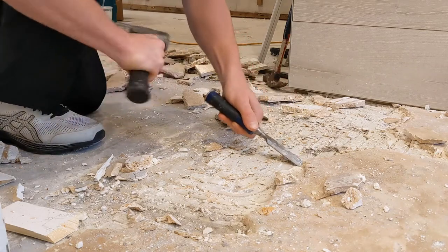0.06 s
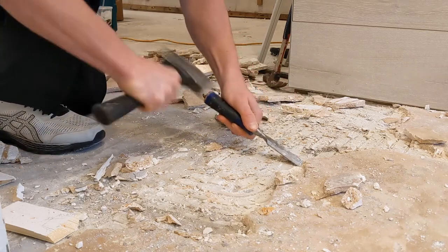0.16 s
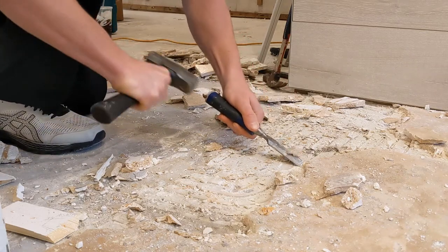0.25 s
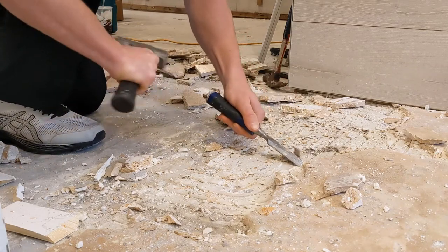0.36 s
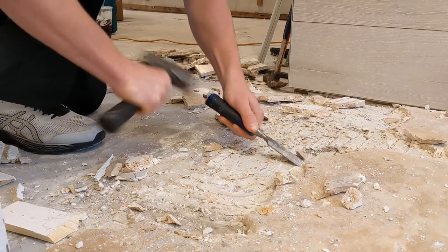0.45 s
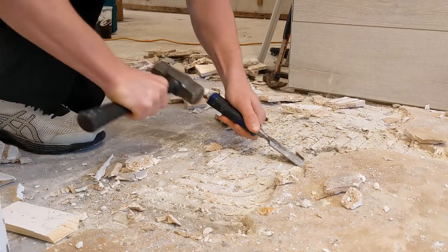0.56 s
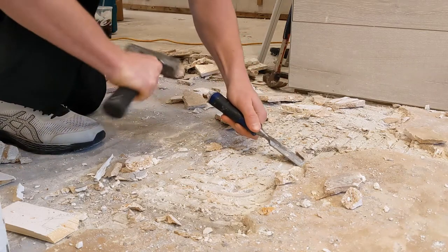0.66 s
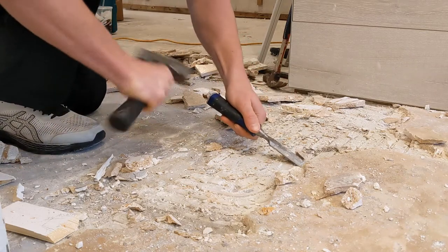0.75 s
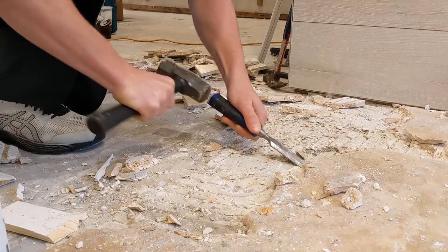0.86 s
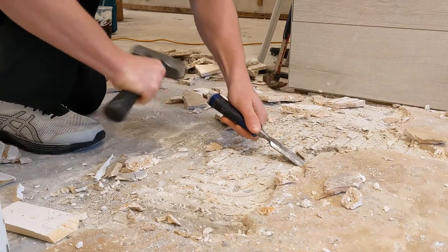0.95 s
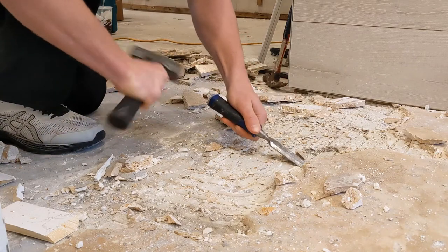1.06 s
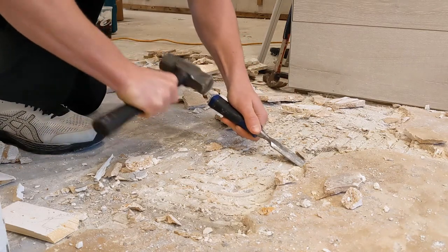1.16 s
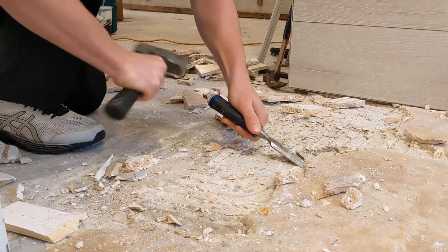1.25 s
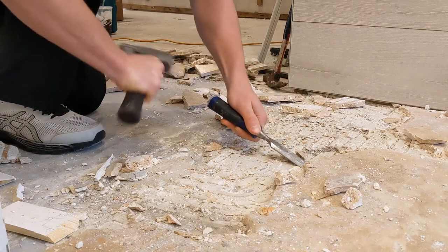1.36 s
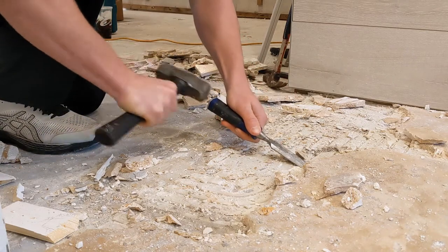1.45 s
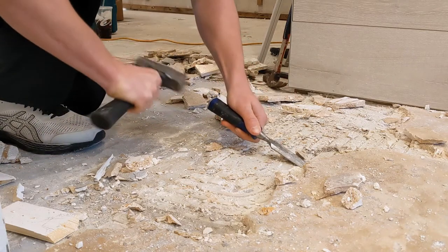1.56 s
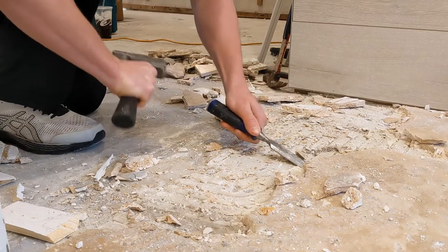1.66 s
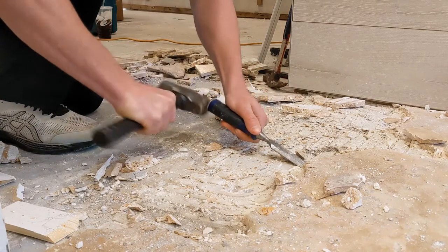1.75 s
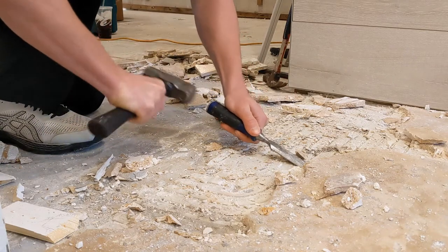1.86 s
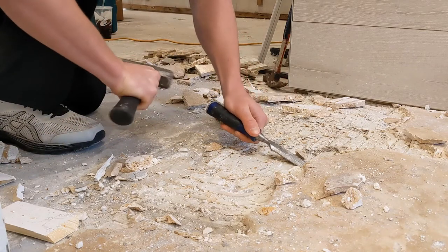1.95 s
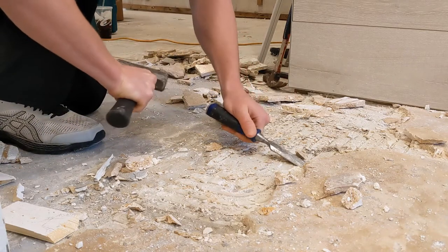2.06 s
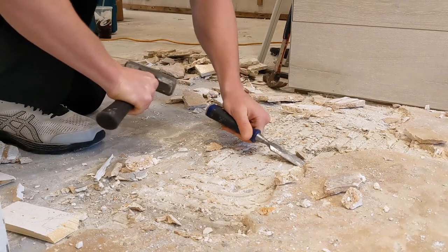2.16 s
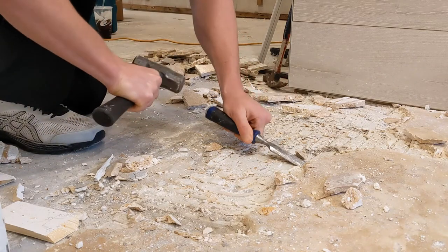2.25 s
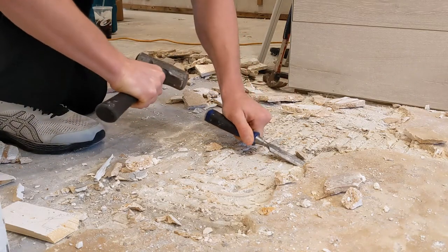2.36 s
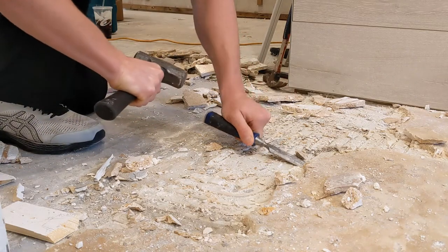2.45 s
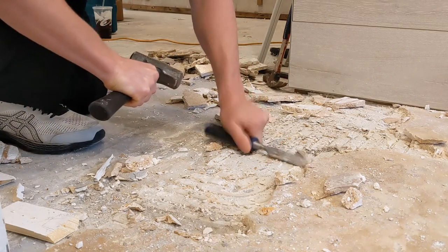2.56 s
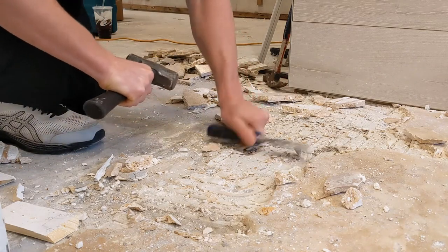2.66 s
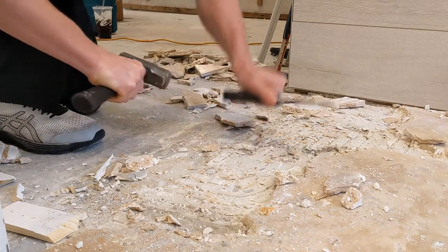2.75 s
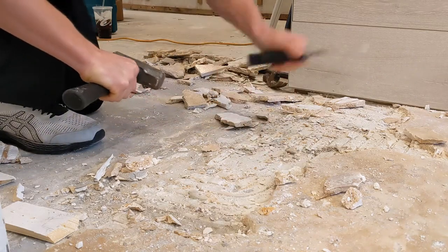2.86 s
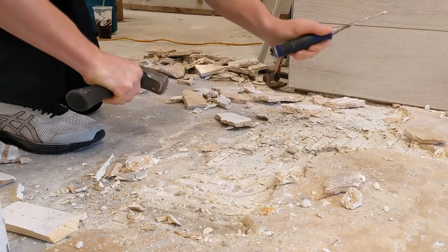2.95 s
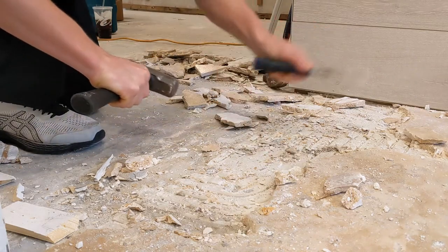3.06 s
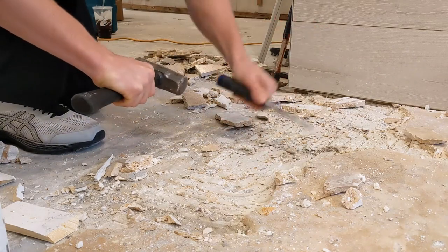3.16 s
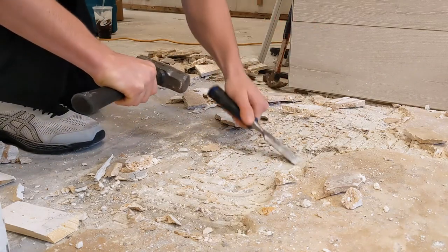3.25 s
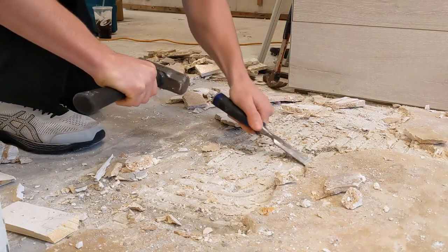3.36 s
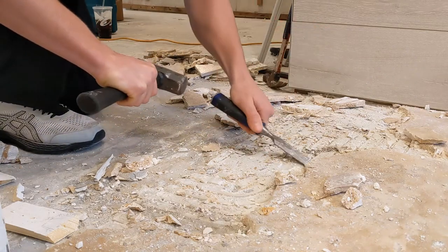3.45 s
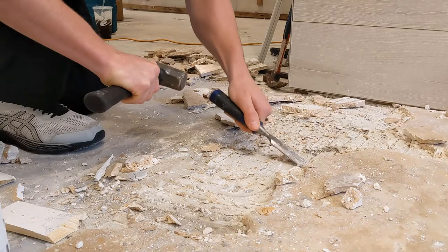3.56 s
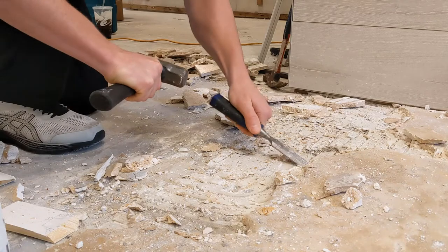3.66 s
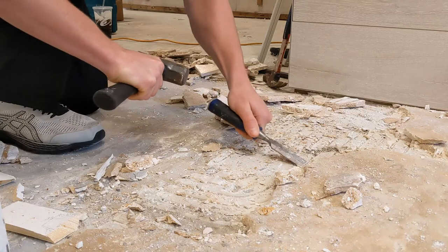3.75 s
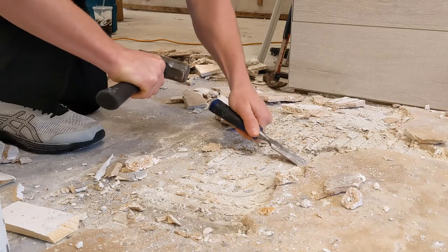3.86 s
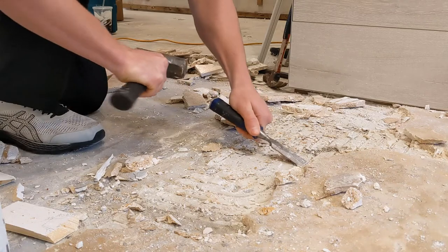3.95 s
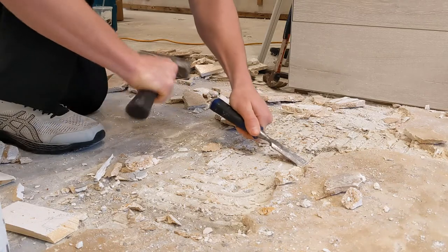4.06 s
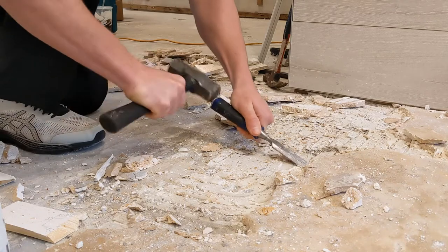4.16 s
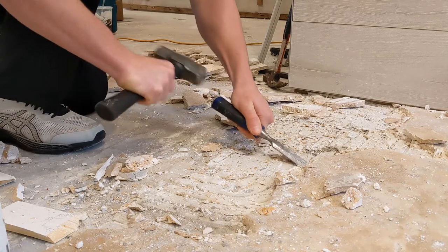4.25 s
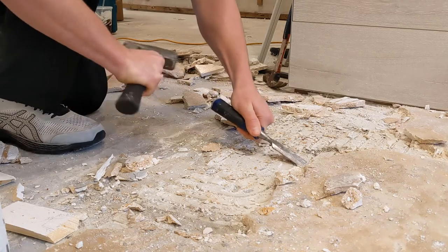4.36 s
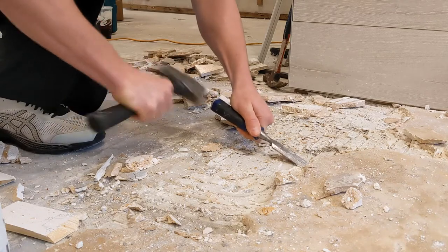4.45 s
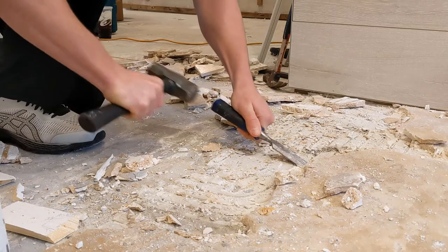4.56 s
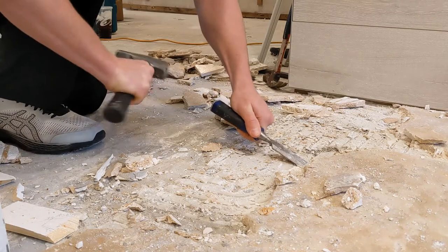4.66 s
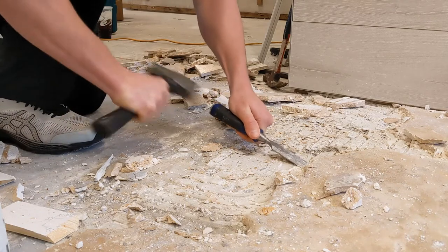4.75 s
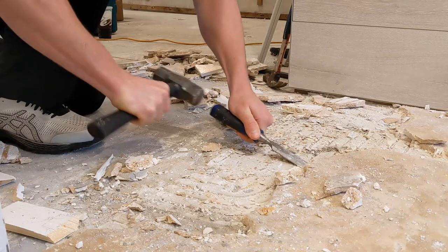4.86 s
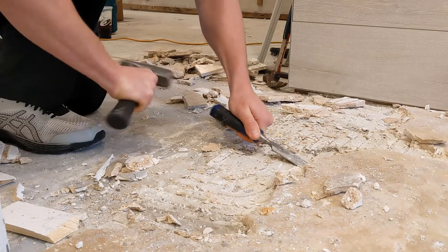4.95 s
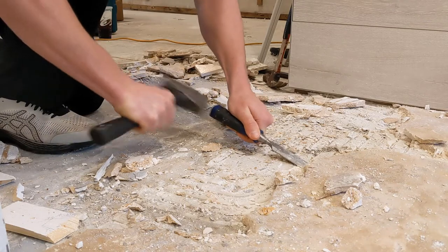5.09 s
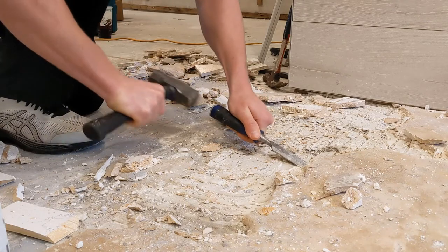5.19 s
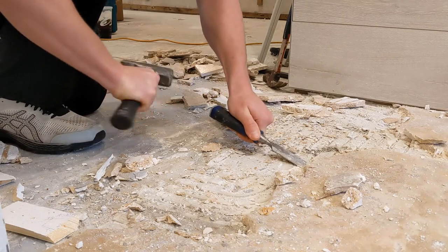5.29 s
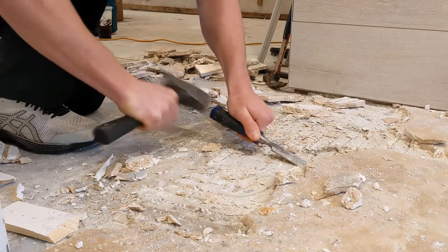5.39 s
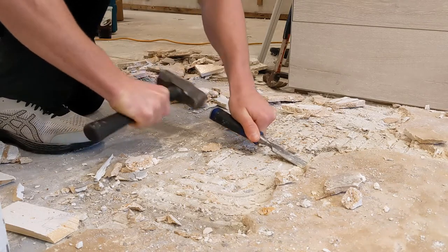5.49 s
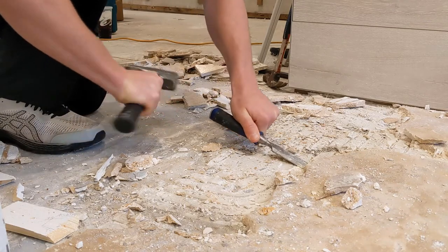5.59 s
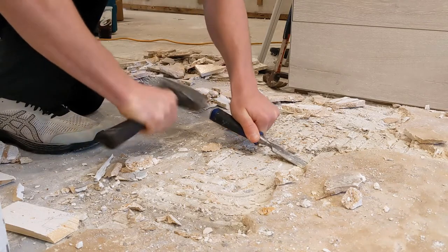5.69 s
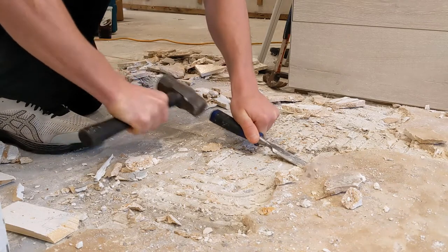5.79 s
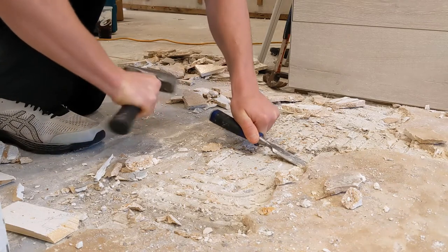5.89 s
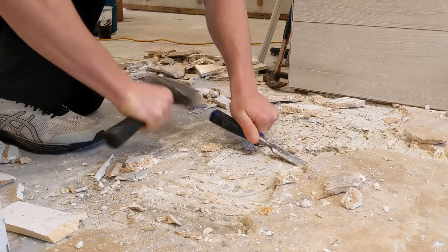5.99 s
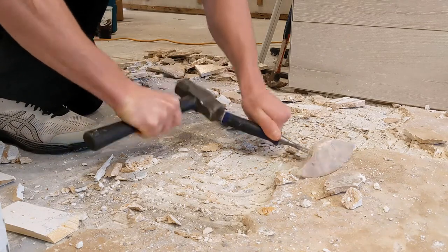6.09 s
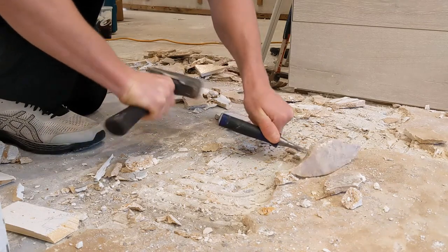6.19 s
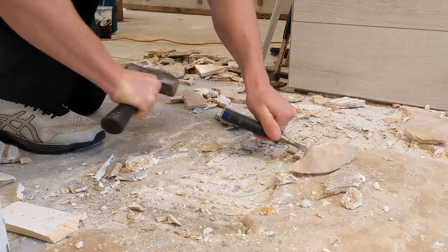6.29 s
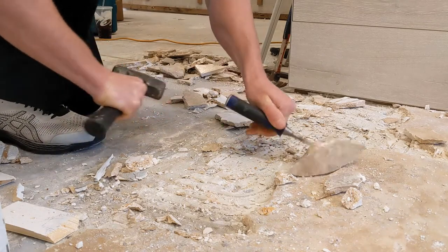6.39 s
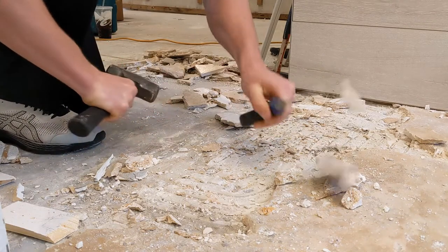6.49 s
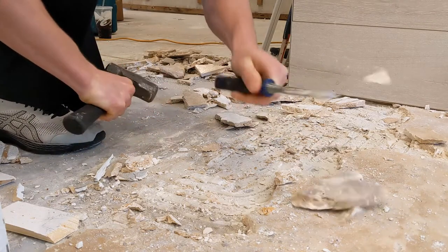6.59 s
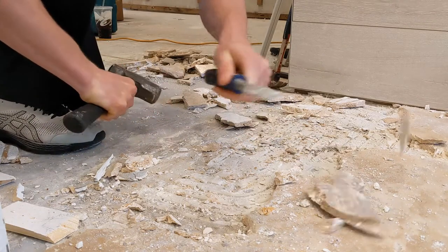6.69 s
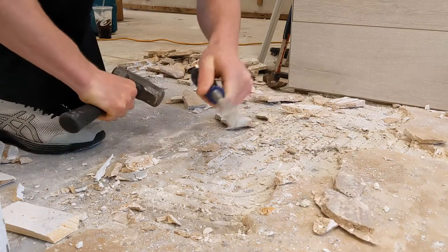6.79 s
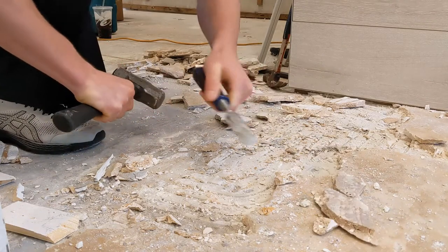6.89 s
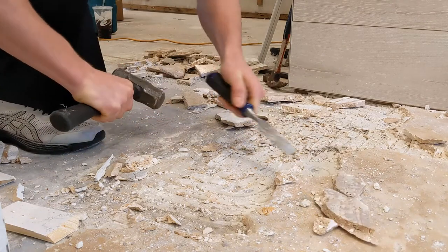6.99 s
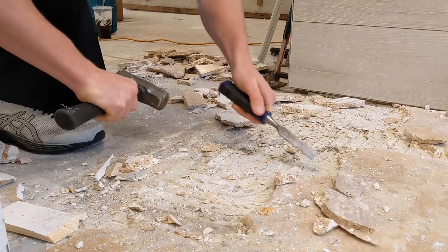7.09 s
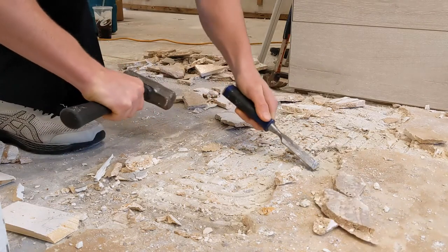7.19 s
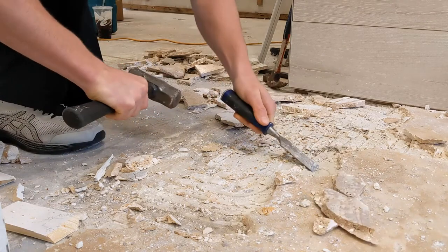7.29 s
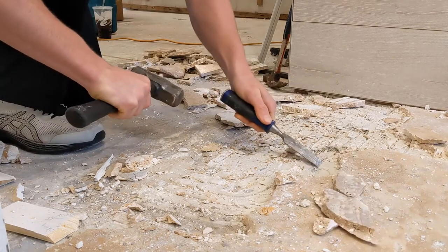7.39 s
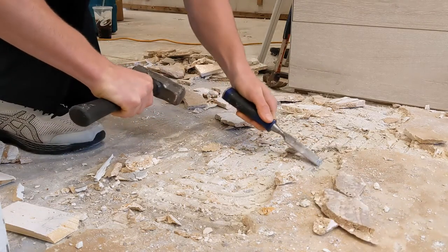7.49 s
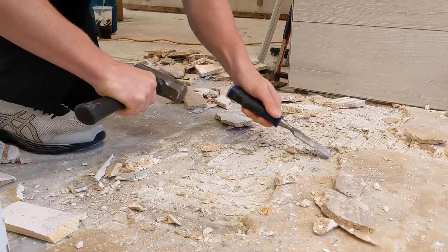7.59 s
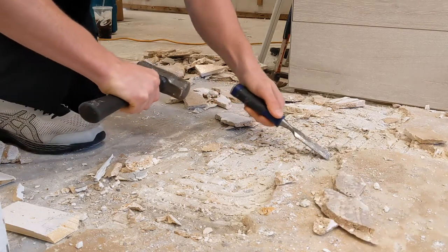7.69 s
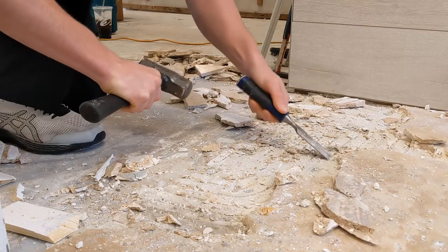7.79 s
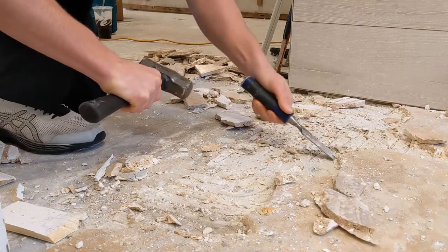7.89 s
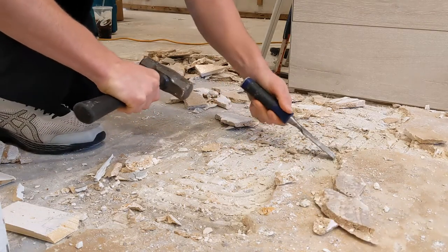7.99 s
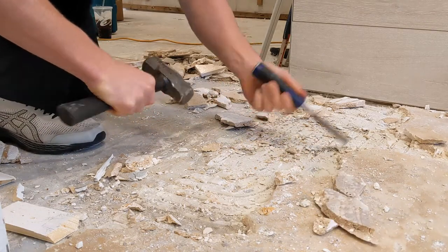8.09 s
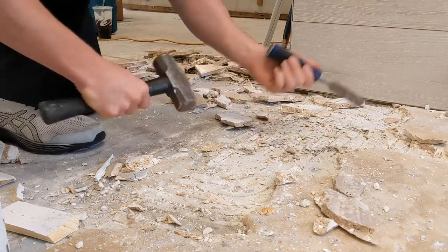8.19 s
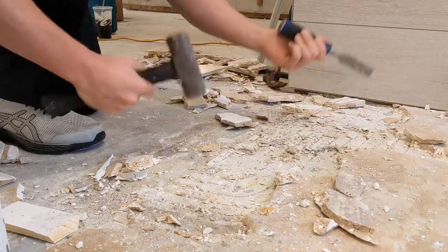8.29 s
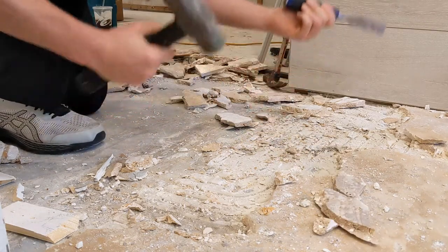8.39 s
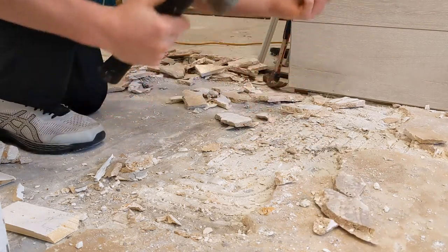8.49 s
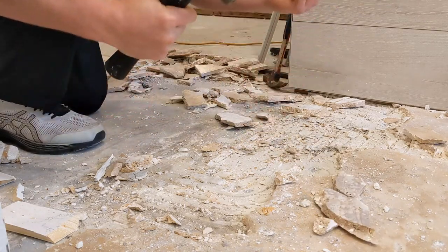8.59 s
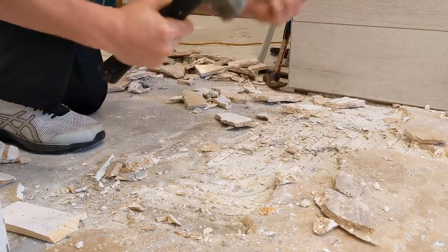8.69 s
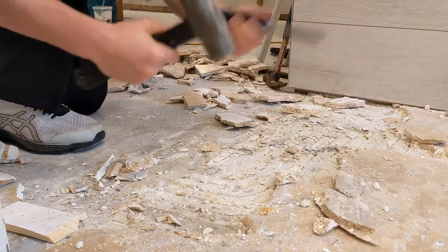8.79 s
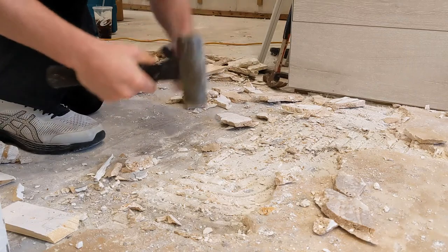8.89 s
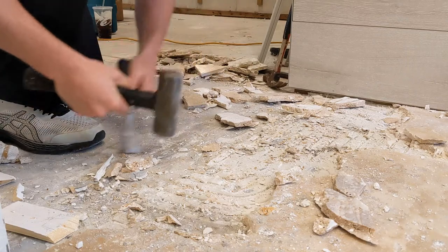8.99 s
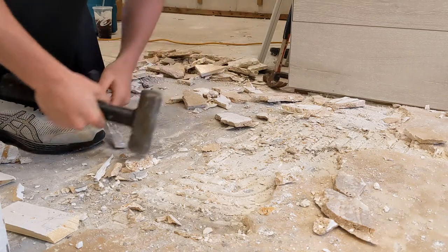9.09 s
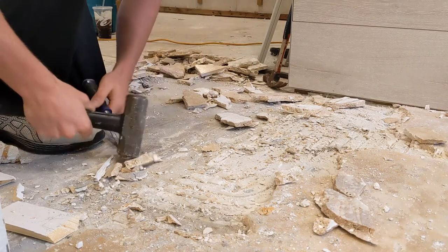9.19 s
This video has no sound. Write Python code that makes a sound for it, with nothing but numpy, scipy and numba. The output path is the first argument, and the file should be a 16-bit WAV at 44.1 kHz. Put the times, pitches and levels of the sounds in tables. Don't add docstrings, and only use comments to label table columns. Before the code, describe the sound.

Close up in a bare, reverberant room, a heavy hammer strikes a steel chisel about three times a second, each loud crack carrying a hollow tile knock and floor thump. Tip taps and gritty scraping fill a pause. A second run ends with falling tile shards, then light taps, quiet, and the hammer landing with tight bounces.

```python
import sys
import numpy as np
from scipy import signal
from scipy.fft import rfft, irfft
from scipy.io import wavfile
from scipy.ndimage import uniform_filter1d, minimum_filter1d
from numba import njit

SR = 44100
rng = np.random.default_rng(int(sys.argv[2]) if len(sys.argv) > 2 else 0)


def put_to_file(sound):
    columns = np.atleast_2d(sound).T
    safe = np.clip(columns, -1, 1)
    whole_steps = np.round(safe * 32767)
    wavfile.write(sys.argv[1], SR, whole_steps.astype(np.int16))


def gain_from_db(level_db):
    decades = np.asarray(level_db, float) / 20
    return 10 ** decades


N = 407484
PAD = SR // 2

# (time [s], heard peak [dB], chisel bend [Hz], bend level [dB], slab thump [dB])
BLOWS = [(-.095, -2.5, 1845, 5, -4.5), (.2220, 1.5, 1792, 2.5, -14), (0.5393, -0.5, 1790, 6.5, -20.5),
         (0.8506, -0.5, 1795, 2.4, -30.5), (1.1672, -3, 1726, 8.5, -21), (1.4860, -2.5, 1608, 9.5, -16),
         (1.809, 0, 1956, -2, -11), (4.1976, -8.5, 1782, 5, -11.5), (4.5299, -2.5, 1690, 7, -11),
         (4.8423, -0.8, 1712, 6.5, -17.5), (5.1572, -2, 1746, 8, -18.5), (5.4571, -1, 1745, 3.5, -20.5),
         (5.7611, -2, 1930, 1.5, -22), (6.0721, -1.5, 1790, 4.5, -37), (6.849, -20.5, 2030, -38, -47.5)]
# (time [s], drum [Hz], drum level [dB], dull knock [dB], edge bite [dB])
TILE_STATE = [(-.1, 1186, 1.5, -1.5, 2), (.54, 1154, 2.7, -6, -0.5), (1.17, 1310, 6.5, -2.5, 0),
              (1.49, 1362, -32.5, -7.5, 4), (1.811, 1455, 1.5, -1, -2), (4.2, 1160, -2, 3.7, -0.5),
              (4.531, 1304, 6, -2, -1.5), (5.16, 1255, -2.2, 1, 2), (6.07, 1258, 4.5, 8, 0)]
# (blow time [s], delay [ms], level re blow [dB])
REBOUNDS = [(-.095, 0.73, -15.5), (.222, .42, -17.5), (.5395, .893, -5), (.8503, .3, -18.5),
            (1.1666, 0.57, -18.5), (4.1977, .823, 5), (4.5295, .6, -16.5), (4.8413, .34, -19.5),
            (5.4568, 0.71, -19.5)]
# (frequency [Hz], width [Hz], level [dB])
STEEL_MODES = [(3305, 1360, -10.5), (4890, 983, 3), (6335, 1850, 6), (7850, 1230, 2)]
# (frequency [Hz], width [Hz], level [dB])
EDGE_MODES = [(9200, 944, -1), (10010, 890, -6), (12360, 2520, 8), (13700, 2800, -9)]
# (time [s], peak [dB])
HEAD_DROPS = [
    (9.1772, -5),
    (9.186, -9),
    (9.1908, -9.5),
]
# (frequency [Hz], width [Hz], level [dB])
HEAD_MODES = [(246, 220, -8.5), (560, 280, -8), (1290, 650, -13), (3300, 690, -11.5), (5300, 310, -0.5),
              (6510, 670, -3.5), (7530, 1100, 2.5), (8550, 410, -7), (10600, 1900, -18.5),
              (12630, 1200, -20.5)]
# (time [s], level [dB])
KNEE_THUDS = [(2.222, -23), (2.644, -34), (6.459, -30), (9.178, -21)]
# (time [s], peak [dB], clatter re ring [dB])
SHARD_FALLS = [(6.454, -18.5, -13.5), (6.472, -23, -3), (6.509, -24, -8), (6.577, 9, -0.5),
               (6.688, -11, -2.5)]
# (frequency [Hz], width [Hz], level [dB])
SHARD_MODES = [(2160, 430, -11.5), (3840, 520, -4.5), (4186, 62, -6), (5270, 880, -0.5), (6250, 800, 4.5),
               (6950, 81, -6), (7700, 740, -5.5), (8900, 75.5, -24.5), (8600, 1300, -15),
               (9640, 120, -27.5), (10900, 3800, -15), (13000, 1300, -12.5)]
# (time [s], peak [dB])
FLAKE_FALLS = [(2.879, -28), (3.205, -59)]
# (frequency [Hz], width [Hz], level [dB])
FLAKE_MODES = [(13340, 150, -4)]
# (time [s], peak [dB], body [Hz], click re body [dB])
TIP_TAPS = [(2.719, -34, 2013, -14.5), (3.327, -27.5, 1740, -7), (3.551, -24, 1760, -22),
            (3.566, -38, 518, -17), (3.400, -26, 1810, -32), (3.658, -32.5, 1690, -10),
            (3.768, -45, 1740, 7.5), (3.978, -49.5, 1720, -6), (4.124, -56.5, 1914, 10),
            (6.819, -29, 2255, -0.5), (7.011, -40.5, 2070, 0.5), (7.285, -29.5, 1310, -3.5),
            (7.357, -29.5, 1890, -16), (7.397, -28.5, 1970, -15), (7.422, -27.5, 1880, -17),
            (7.554, -25.5, 1990, -15), (7.67, -24, 1835, -7.5), (7.888, -45, 1900, -15),
            (7.909, -29.5, 1790, -7), (7.941, -39.5, 2100, 5), (3.622, -44, 1840, -16),
            (8.554, -50.5, 2200, 4), (9.054, -19, 1280, -3.5), (9.064, -16.5, 2170, -18),
            (9.078, -20.5, 1332, -20), (9.102, -20, 2260, -9.5)]
# (time [s], peak [dB], body [Hz], click re body [dB])
TILE_KNOCKS = [(2.589, -19.5, 1130, -3.5), (2.644, -9.5, 1230, -20), (6.433, -17, 1550, -7),
               (6.469, -11, 1310, -10), (8.095, -30, 1310, -6.5), (8.166, -31.5, 700, -10)]
# (time [s], hold [s], body [dB], grit re body [dB], hollow rattle re body [dB])
SCRAPES = [(2.591, 0.012, -32, 1.5, -34), (2.65, .006, -31, -10, -22), (2.681, .11, -49, 2, -17),
           (3.334, .07, -43.5, -6, -12.5), (3.539, 0.016, -42, -0.5, -8), (3.554, 0.0085, -51.5, -15, -1),
           (3.6, .1, -63.5, 1, -22.5), (6.421, .04, -40, -9, -9.5), (6.463, .004, -29, -2, -9),
           (6.482, .04, -46, -5.5, -12.5), (7.353, .04, -39, -6.5, -12), (7.888, 0.044, -45, -4.5, -19),
           (7.934, 0.0099, -46, 1.5, -21), (9.055, 0.0075, -39.5, 3.5, -19), (9.081, .095, -44, -11.5, -15)]
# (frequency [Hz], width [Hz], level [dB])
TIP_MODES = [(506, 98, -14.5), (1310, 200, 1.5), (1880, 115, 1), (2260, 170, -4.5)]
# (frequency [Hz], width [Hz], level [dB])
GRIT_MODES = [(2770, 970, 0), (4300, 890, 5.5), (5340, 900, 1), (7170, 1600, 2)]
# (frequency [Hz], width [Hz], level [dB])
FIZZ_MODES = [(9200, 1200, -1.5), (11100, 1800, -1), (13500, 2900, -1)]
# (frequency [Hz], t60 [s], level [dB], left-right likeness [0-1])
ROOM_BANDS = [(60, 0.62, -3, 0.8), (143, 0.52, 0, 0.9), (294, 0.88, -0.5, 0.7), (705, 1.026, 4, 0.48),
              (1480, 1.278, -1.5, 0), (2640, 1.035, 2, 0.05), (6800, 1, -1, 0), (15530, 0.33, 0.4, 0.3)]
# (frequency [Hz], density [dB per Hz])
AIR_BANDS = [(25, -32.5), (48, 0.5), (90, -18), (124, -6), (204, -25.5), (526, -24.5), (1720, -33),
             (16000, -47.5)]
# (time [s], frequency [Hz], level [dB])
MOTOR_HUM = [(2.3, 85.4, -58), (2.592, 85.4, -56), (2.624, 85.7, -83), (2.722, 85.4, -54.5),
             (3.778, 91.2, -65), (3.958, 90.9, -62), (4.15, 93.3, -71)]

OVERLOAD_DB = 20.5
DRUM_WIDTH_HZ, CLANK_DB, EDGE_DB = 316, 7.5, 3
TILE_GONE_S, BARE_DB = 6.3, -27.5
BOOM_PER_THUMP, USUAL_THUMP_DB = 0.36, -19.5
RING_WIDTH_HZ = 200
TAP_WIDTH_HZ, KNOCK_WIDTH_HZ = 60, 380
TAP_FIZZ_DB, TAP_ROOM_DB = 0.5, 0.5
SCRAPE_RISE_DB_S, SCRAPE_FALL_DB_S, SCRAPE_FIZZ_DB = 9000, 340, -13
AIR_DB = -63
TOP_HZ = 15850


def ring(modes, chance, rise_ms=0.11, burst_ms=0., turn_rad=2.1):
    t = np.arange(3072) / SR
    hz, width_hz, db = np.transpose(modes)[:, :, None]
    k = len(modes)
    phase = np.pi * np.arange(k) + np.vstack([turn_rad * (chance[:2, :k] - .5), np.zeros(k)])
    gain = gain_from_db(db[:, 0] + np.vstack([4 * (chance[2:4, :k] - .5), np.zeros(k)]))
    swing = np.sin(2 * np.pi * hz * t + phase[..., None])
    wave = gain[..., None] * np.exp(-np.pi * width_hz * t) * swing
    wave = wave.sum(axis=1) * (1 - np.exp(-t / rise_ms * 1000))
    if burst_ms:
        rough = (chance[4:6] - .5) * np.exp(-t[:chance.shape[1]] * 1000 / burst_ms)
        rough = rough / np.sqrt((rough ** 2).sum(axis=1, keepdims=True))
        wave[:2] = signal.fftconvolve(wave[:2], rough, axes=1)[:, :len(t)]
    return wave


def thump(first_ms, left_db=-7.0):
    t = np.arange(2048) / SR * 1000 / first_ms
    envelope = t / (.03 + t) / (.2 + 2.2 * t) ** .7 * np.exp(-t / 30)
    wave = -np.sin(np.pi * np.sqrt(t)) * envelope
    return 0.98 * wave * gain_from_db([[left_db], [0], [-200]])


def add(out, s, sound):
    i = int(s * SR) + PAD
    out[:, i:i + sound.shape[1]] += sound[:, :out.shape[1] - i]


def hammer_blows(air, slab):
    push = thump(first_ms=1.3)
    boom = ring([(59.3, 51, -33.0), (131, 30, -33), (358, 217, -23)], rng.random((6, 12)), rise_ms=1.7)
    boom = boom * gain_from_db([[-200], [-200], [0]])
    head = [(f, w, d + (CLANK_DB if f < 4000 else 0)) for f, w, d in STEEL_MODES]
    when, *tile = np.transpose(TILE_STATE)
    for (s, db, bend_hz, bend_db, thump_db), c in zip(BLOWS, rng.random((len(BLOWS), 6, 48))):
        drum_hz, drum_db, knock_db, bite_db = (np.interp(s, when, v) for v in tile)
        bare_db = BARE_DB * (s > TILE_GONE_S)
        body = [(760, 320, knock_db + bare_db - 14.0),
                (drum_hz, DRUM_WIDTH_HZ, drum_db + bare_db - 11.0),
                (bend_hz, 170, bend_db - 12)]
        steel = head + [(f, w, d + EDGE_DB + bite_db) for f, w, d in EDGE_MODES]
        crack = ring(steel, c, burst_ms=.2) * gain_from_db([[1.5], [1.5], [0]])
        blow_db = db + OVERLOAD_DB
        sound = gain_from_db(blow_db - 7.5) * (crack - ring(body, c[:, 10:]))
        add(air, s, sound)
        for blow_s, delay_ms, again_db in REBOUNDS:
            if abs(blow_s - s) < .02:
                add(air, s + delay_ms / 1000, sound * gain_from_db(again_db))
        add(slab, s, gain_from_db(blow_db + thump_db) * push)
        add(slab, s, gain_from_db(blow_db + BOOM_PER_THUMP * (thump_db - USUAL_THUMP_DB)) * boom)


def hammer_laid_down(air):
    for (s, db), c in zip(HEAD_DROPS, rng.random((len(HEAD_DROPS), 6, 48))):
        body = ring(HEAD_MODES[:3], c, turn_rad=1.1)
        steel = ring(HEAD_MODES[3:], c, burst_ms=0.94)
        add(air, s, gain_from_db(db) * (body - steel))


def knee_thuds(slab):
    for s, db in KNEE_THUDS:
        add(slab, s, gain_from_db(db) * thump(first_ms=3.0))


def falling_shards(out):
    for (s, db, clatter_db), c in zip(SHARD_FALLS, rng.random((len(SHARD_FALLS), 6, 14))):
        modes = [(f, w, d + clatter_db * (w > RING_WIDTH_HZ)) for f, w, d in SHARD_MODES]
        add(out, s, gain_from_db(db) * ring(modes, c, rise_ms=0.05, turn_rad=2.4))
    flake = ring(FLAKE_MODES, rng.random((6, 12)))
    for s, db in FLAKE_FALLS:
        add(out, s, gain_from_db(db) * flake)


def light_knocks(out):
    for table, width_hz in ((TIP_TAPS, TAP_WIDTH_HZ), (TILE_KNOCKS, KNOCK_WIDTH_HZ)):
        for (s, db, hz, click_db), c in zip(table, rng.random((len(table), 6, 96))):
            body = sorted([(hz, width_hz, -6)] + [(f, w, d - 14) for f, w, d in TIP_MODES])
            click = [(f, w, d + click_db) for f, w, d in GRIT_MODES]
            click += [(f, w, d + click_db + TAP_FIZZ_DB) for f, w, d in FIZZ_MODES]
            sound = ring(body, c, turn_rad=5.6) - ring(click, c[:, 6:], burst_ms=0.98)
            add(out, s, sound * gain_from_db([[db], [db], [db + TAP_ROOM_DB]]))


def scrape(grains_per_s=900., scatter_db=5.5):
    t = (np.arange(N + PAD) - PAD) / SR
    slips = rng.random(len(t)) < grains_per_s / SR
    slips = slips * gain_from_db(scatter_db * np.minimum(rng.exponential(size=len(t)), 2))
    slips = slips * np.sign(rng.standard_normal(len(t)))
    start_s, hold_s, db, grit_db, rattle_db = np.transpose(SCRAPES)
    drags = []
    for a, h in zip(start_s, hold_s):
        rise_db = -SCRAPE_RISE_DB_S * np.maximum(a - t, 0)
        fall_db = -SCRAPE_FALL_DB_S * np.maximum(t - a - h, 0)
        drags.append(gain_from_db(rise_db + fall_db))
    drags = np.array(drags)
    rattle_modes = TIP_MODES[:1] + [(697, 170, -10)]
    voices = ((TIP_MODES[1:], 0), (GRIT_MODES, grit_db),
              (FIZZ_MODES, SCRAPE_FIZZ_DB), (rattle_modes, rattle_db))
    out = 0
    for modes, above_db in voices:
        grain = ring(modes, rng.random((6, 24)), burst_ms=0.18)
        voice = signal.fftconvolve(slips[None], grain, axes=1)[:, :len(t)]
        out = out + gain_from_db(db + above_db) @ drags * voice / voice.std()
    return out * gain_from_db([[-.4], [-.4], [-3]])


def bands(table, column, step_oct=.34):
    hz = 35 * 2 ** np.arange(0, 9, step_oct)
    table = np.array(table)
    return hz, np.interp(np.log(hz), np.log(table[:, 0]), table[:, column])


def band_noise(hz, n, like):
    f = np.arange(n // 2 + 1) * SR / n + 1
    mask = np.exp(-(np.log2(f / hz) / .24) ** 2)
    mid, side = irfft(rfft(rng.standard_normal((2, n))) * mask, n)
    like = np.clip(like, 0, 1)
    return np.sqrt((1 + like) / 2) * mid + np.sqrt((1 - like) / 2) * side * np.array([[1], [-1]])


def room(x, level_db=-33.5, early_db=-14.5, early_s=0.74, gap_ms=4.):
    n = 2 ** 16
    t = np.arange(n) / SR
    hz_all, t60_all = bands(ROOM_BANDS, column=1)
    db_all = bands(ROOM_BANDS, column=2)[1]
    like_all = bands(ROOM_BANDS, column=3)[1]
    answer = 0
    for hz, t60_s, db, like in zip(hz_all, t60_all, db_all, like_all):
        fade = gain_from_db(db - 60 * t / t60_s) * (1 + gain_from_db(early_db - 60 * t / early_s))
        answer = answer + fade * band_noise(hz, n, like)
    answer = answer * gain_from_db(level_db) * np.clip(t * 1000 / gap_ms - .5, 0, 1)
    answer = signal.sosfilt(signal.ellip(8, .2, 60, TOP_HZ, fs=SR, output="sos"), answer)
    return signal.fftconvolve(x[:1], answer, axes=1)[:, :x.shape[1]]


def room_air():
    out = 0
    for hz, db in zip(*bands(AIR_BANDS, column=1)):
        wander = np.interp(np.arange(N), np.linspace(0, N, 40), rng.standard_normal(40))
        out = out + gain_from_db(db + 0.53 * wander) * band_noise(1.1 * hz, N, 300 / hz)
    return out / out.std() * gain_from_db(AIR_DB + 3.0)


def distant_motor():
    t = np.arange(N) / SR
    s, hz, db = np.transpose(MOTOR_HUM)
    phase = 2 * np.pi * np.cumsum(np.interp(t, s, hz)) / SR
    hum = np.sqrt(2) * gain_from_db(np.interp(t, s, db, -200, -200)) * np.sin(phase)
    return uniform_filter1d(hum, size=50)


def scene():
    air, slab = np.zeros((2, 3, N + PAD))
    hammer_blows(air, slab)
    hammer_laid_down(air)
    knee_thuds(slab)
    debris = np.zeros((3, N + PAD))
    falling_shards(debris)
    light_knocks(debris)
    air = air + (debris + scrape()) * gain_from_db([[0], [0], [-2.5]])
    air = signal.lfilter(*signal.butter(2, 260, "high", fs=SR), air)
    direct = air[:2] * gain_from_db([[.7], [-.7]])
    near = np.array([np.roll(air[0], 86), np.roll(air[1], 97)]) * gain_from_db(-4)
    total = direct + near + slab[:2] + room(air[2:] + slab[2:])
    return total[:, PAD:] + (room_air() + distant_motor()) * gain_from_db([[.5], [-.5]])


@njit
def slew(db, start_db, fall, rise):
    out, g = np.empty(len(db)), start_db
    for i in range(len(db)):
        g += (db[i] - g) * (fall if db[i] < g else rise)
        out[i] = g
    return out


def low_pass(x):
    return signal.sosfilt(signal.butter(12, 16840, fs=SR, output="sos"), x)


def record(dry, top_db=-0.5, ahead_ms=11.0, hold_ms=82.4, release_ms=33.1):
    peak_db = 10 * np.log10(uniform_filter1d((dry ** 2).mean(axis=0), size=33) * 4 + 1e-12)
    ahead, hold = int(ahead_ms * SR / 1000), int(hold_ms * SR / 1000)
    span = ahead + hold
    need_db = np.pad(np.minimum(top_db - peak_db, 0), (span, span))
    lowest_db = minimum_filter1d(need_db, size=2 * (span // 2) + 1)
    goal_db = lowest_db[span + (ahead - hold) // 2:][:N]
    gain_db = slew(goal_db, -15.0, 1000 / (1.2 * SR), 1000 / (release_ms * SR))
    x = dry * gain_from_db(gain_db)
    x = signal.sosfilt(signal.butter(2, 50, "high", fs=SR, output="sos"), x)
    x[0] = signal.lfilter(*signal.butter(1, 220, "high", fs=SR), x[0]) * gain_from_db(-6.0) + 0.57 * x[0]
    return low_pass(np.tanh(x))


dry = scene()
out = record(dry)
put_to_file(out)
```